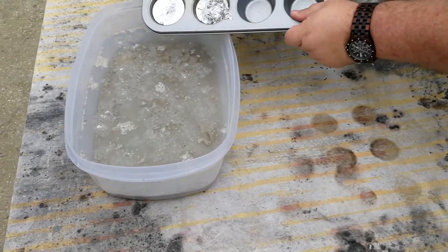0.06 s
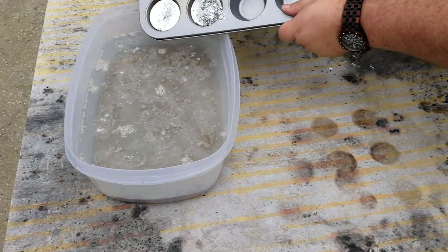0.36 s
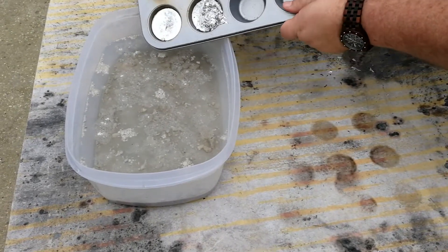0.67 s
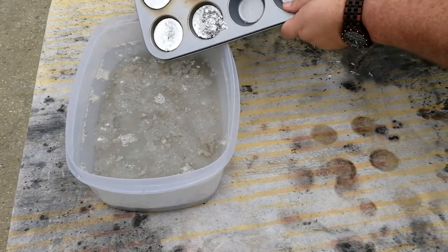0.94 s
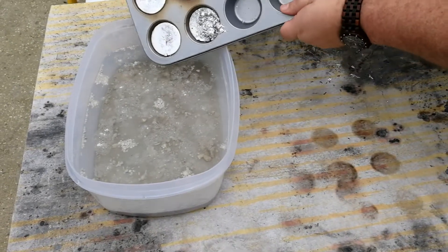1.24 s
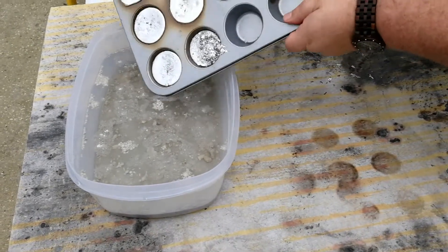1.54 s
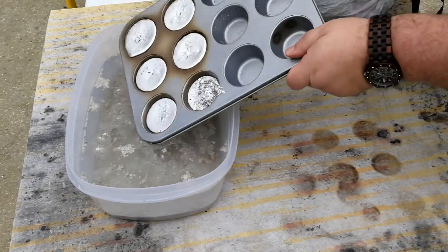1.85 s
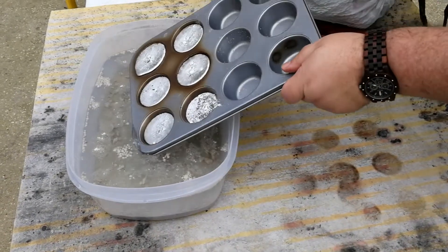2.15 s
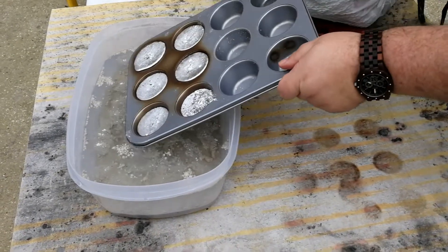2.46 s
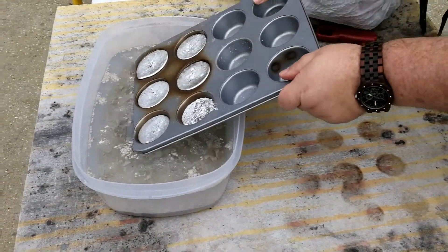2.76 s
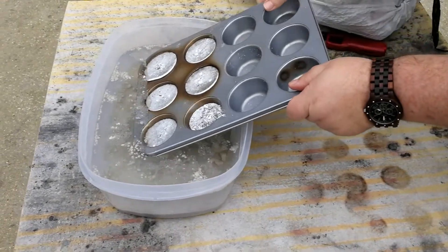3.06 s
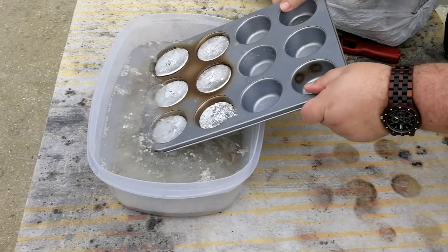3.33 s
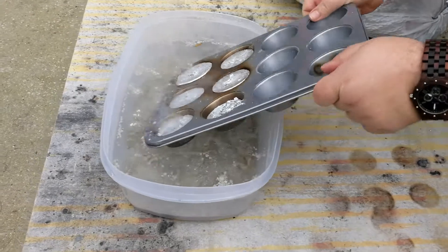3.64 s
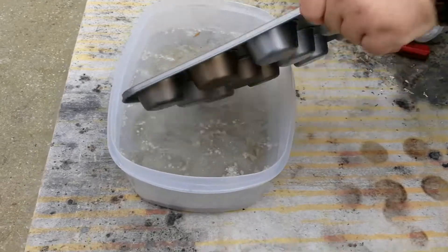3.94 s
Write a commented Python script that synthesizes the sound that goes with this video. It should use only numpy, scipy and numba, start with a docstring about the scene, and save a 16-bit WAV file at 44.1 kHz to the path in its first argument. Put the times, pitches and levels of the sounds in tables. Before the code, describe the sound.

A hot metal baking tin sizzles in a plastic tub of water. First a nearby blower whines over a low rumble, then steam hisses and the water boils and spits, close and to the left, outdoors.

```python
"""Hot baking tin dipped in water

Outdoors, a hot metal tin ticks, then goes into a plastic tub of water on the left. Steam hisses,
tiny bubbles collapse in a dense sizzle, and the water boils, spits and gushes as the cups go under.
All the while a blower whines nearby over a low rumble, probably the burner of a furnace."""
import sys
import numpy as np
from scipy import signal
from scipy.fft import rfft, irfft
from scipy.io import wavfile
from numba import njit

SR = 44100
rng = np.random.default_rng(int(sys.argv[2]) if len(sys.argv) > 2 else 0)


def log_audio(samples):
    """Write samples as a 16-bit WAV file to the path given in sys.argv[1]."""
    # one column per channel
    frames = np.atleast_2d(samples).T
    # limit to full scale, then quantise
    limited = np.clip(frames, -1, 1)
    pcm = np.round(limited * 32767).astype(np.int16)
    wavfile.write(sys.argv[1], SR, pcm)


N = 176400
T, HZ = np.arange(N) / SR, np.maximum(np.arange(N // 2 + 1) * SR / N, 1)
EAR_LAG_S = .0002  # the right ear hears this much later
SPIT_CYCLES, SPIT_SPREAD_DB = 56, 4  # bubbles in the spits and the gush

# Tone colours. Each row: frequency in Hz, relative level in dB.
RUMBLE_COLOUR = [(20, -22), (35, -9.5), (58, -8), (100, -6.5), (135, -2), (168, 4.5), (188, -1.5),
                 (213, 4.5), (245, 2), (292, -14), (348, -12), (366, -21), (386, -10.5), (422, -16),
                 (440, -25.5), (570, -31), (610, -43.5), (800, -45.5)]
RUMBLE_SIDE = [(80, -11), (200, -18.5), (270, -13), (330, 3.5), (450, 0), (800, 15)]  # the part that differs between the ears
RUMBLE_LEFT_BOOST = [(380, 0), (480, 3), (800, 7.5)]  # left ear compared with right
AIR_LEFT = [(500, -3), (850, -7), (1370, -3), (1620, 11), (2000, 1), (2370, 12), (2650, -3.5), (4700, -13),
            (7200, 2.5), (8050, 9), (9000, 5), (13000, -1.5), (16000, -17)]
AIR_RIGHT = [(500, -2), (900, 10), (1300, 9), (1630, 22.5), (2000, 1), (2370, 8.5), (3000, -4), (5000, -2),
             (5700, 10.5), (8200, 10.5), (16000, -18)]
STEAM_COLOUR = [(2000, -18), (5800, -11), (8200, -1.5), (10500, 0), (13300, 0), (14800, -2), (16000, -6)]
SIZZLE_COLOUR = [(600, -5), (1100, -3.5), (1900, -2.5), (2400, 1.5), (4200, 0), (6000, -2), (11000, -4),
                 (16000, -5.5)]
RIGHT_EAR_SHADE = [(500, -12), (2500, -7.5), (4500, -17), (8500, -13), (11000, -21), (16000, -23)]  # how much weaker the tub is on the right

# Loudness over time. Each row: time in seconds, relative level in dB.
DEEP_RUMBLE_LEVEL = [(.12, -35), (.22, -26.5), (.55, -32), (.9, -31), (1.3, -35), (1.52, -31.5),
                     (1.8, -40.5), (2.33, -34), (2.5, -42), (3.1, -43.5), (3.28, -35.5), (3.45, -43.5),
                     (4.0, -38.5)]
MIDDLE_RUMBLE_LEVEL = [(0, -25), (.25, -26), (.6, -29.5), (1.4, -28), (2.0, -28.5), (2.5, -32),
                       (2.75, -29.5), (4.0, -33)]
UPPER_RUMBLE_LEVEL = [(1.4, -41), (3.1, -46.5), (3.9, -39.5)]
WHINE_LEVEL = [(0, 2), (.6, -2), (1.25, 5.5), (2.0, -2.5), (3.7, 4.5)]
OVERTONE_LEVEL = [(0, -0.5), (1.7, -2)]
AIR_TREBLE_LEVEL = [(0, 2.5), (.16, 4.5), (.35, -2.5)]
STEAM_LEVEL = [(1.755, -57), (1.776, -34.5), (1.9, -25.5), (2.02, -24), (2.16, -29), (2.25, -33.5),
               (2.49, -36), (2.55, -31.5), (2.77, -39.5), (2.9, -31.5), (3.04, -37), (3.15, -32.5),
               (3.5, -31.5), (3.7, -37), (4.0, -40.5)]
SIZZLE_LEVEL = [(1.76, -40), (1.95, -29.5), (2.25, -33.5), (2.5, -36.5), (2.56, -29.5), (2.77, -33.5),
                (3.05, -33), (3.5, -31), (3.85, -34.5), (4.0, -38.5)]
BOIL_LEVEL = [(1.76, -57), (1.8, -44), (1.96, -39.5), (2.41, -41), (2.5, -43), (4.0, -47.5)]

# The blower's tones. Each row: multiple of the lowest pitch, left and right base levels in dB.
WHINE_TONES = [(1, -62.5, -53.5), (2, -53.5, -79), (3, -51, -77)]
# Ticks of the tin. Each row: start in seconds, relative level in dB.
TIN_TICKS = [(.0412, -8.5), (.0437, -16)]
# Notes of the hollow under the tin. Each row: pitch in Hz, base width in Hz, relative level in dB.
HOLLOW_NOTES = [(1130, 125, 2), (1640, 120, -2.5), (2790, 170, -3)]
# Boiling pockets. Each row: peak time and half length in seconds, pitch and filter width in Hz,
# level in dB.
BOIL_SURGES = [(1.816, 0.083, 3900, 1100, -41), (1.95, 0.043, 1130, 222, -38), (2.0, 0.18, 2750, 340, -41),
               (2.276, 0.22, 4710, 380, -41.5), (2.412, 0.04, 1190, 200, -41), (2.65, .065, 2830, 300, -39),
               (2.723, 0.13, 2380, 400, -42), (2.77, 0.08, 1590, 260, -42.5),
               (2.953, 0.053, 3600, 1100, -36.5), (3.21, 0.17, 3670, 600, -41),
               (3.45, 0.22, 6060, 4030, -35), (3.797, .17, 2610, 1500, -46)]
# Spits of water. Each row: start and length in seconds, pitch in Hz, spread in octaves, level in dB.
WATER_SPITS = [(2.001, 0.026, 8050, 0.31, -23), (2, 0.029, 4440, 0.058, -32),
               (2.077, 0.012, 6440, 0.613, -24), (2.081, 0.008, 2440, 0.6, -31),
               (2.181, 0.0092, 5950, 0.36, -28), (2.247, .016, 4800, 0.045, -35.5),
               (2.391, 0.007, 4870, 0.04, -30), (2.456, .016, 6730, 0.5, -32.5),
               (2.517, .022, 5540, 0.58, -26.5), (2.551, .010, 6850, 0.28, -25),
               (2.563, 0.011, 4360, 0.33, -32.5)]
# Single bubbles. Each row: start in seconds, pitch in Hz, length in cycles, level in dB.
BIG_BUBBLES = [(2.462, 510, 16, -28), (2.9655, 3750, 50, -17), (2.968, 3950, 45, -14),
               (2.9705, 3050, 50, -19.5)]
# Tub echoes, left ear then right. Each row: decay in seconds, level in dB against the direct sound.
WALL_ECHOES = [(.008, -12), (.018, 8)]


def undb(db):
    """Turn decibels into a gain."""
    return 10 ** (np.asarray(db) / 20)


def unit(x):
    """Scale a signal to an average power of 1."""
    return x / np.sqrt(np.mean(x ** 2) + 1e-20)


def curve(rows):
    """Gain over time from a loudness table."""
    return undb(np.interp(T, *np.array(rows).T))


def response(rows):
    """Gain over frequency from a colour table."""
    hz, db = np.array(rows).T
    return undb(np.interp(np.log(HZ), np.log(hz), db))


def shape(x, gain):
    """Filter a signal with one gain per frequency."""
    return irfft(rfft(x) * gain, N)


def resonance(hz, width):
    """A filter that favours one pitch."""
    return 1 / (1 + 1j * (HZ / hz - hz / HZ) * hz / width)


def noise():
    """White noise."""
    return rng.standard_normal(N)


def wander(rate_hz):
    """A smooth random wobble with a spread of 1."""
    return unit(shape(noise(), np.exp(-(HZ / rate_hz) ** 2)))


def crackle(per_s, spread_db):
    """Random clicks of tiny collapses; more spread makes a few stand out."""
    clicks = (rng.random(N) < per_s / SR) * rng.choice([-1, 1], N)
    return unit(clicks * undb(spread_db * np.minimum(rng.exponential(size=N), 5)))


@njit
def ring_bubbles(start, hz, cycles, strength, glide=.023):
    """Each bubble is a sine wave that rises slightly in pitch as it fades by 50 dB."""
    out = np.zeros(N)
    for k in range(len(start)):
        length = max(int(cycles[k] / hz[k] * SR), 2)
        first, phase = int(start[k] * SR), 0.
        for i in range(min(length, N - first)):
            phase += 2 * np.pi * hz[k] * (1 + glide * i / length) / SR
            out[first + i] += strength[k] * np.sin(phase) * np.exp(-5.75 * i / length)
    return out


def burner_rumble(deep_hz=146.6, upper_hz=295):
    """A turbulent roar, alike in both ears in the bass; its three bands swell separately."""
    colour = response(RUMBLE_COLOUR) / (1 + (HZ / 950) ** 6)
    shared = shape(noise(), colour)
    side = shape(noise(), colour * response(RUMBLE_SIDE))
    lean_left = np.sqrt(response(RUMBLE_LEFT_BOOST)) * np.exp(1j * np.pi * HZ * EAR_LAG_S)
    ears = np.array([shape(shared + side, lean_left), shape(shared - side, 1 / lean_left)])
    deep = 1 / (1 + (HZ / deep_hz) ** 10)
    upper = 1 / (1 + (upper_hz / HZ) ** 10)
    middle = 1 - deep - upper
    bands = (deep, DEEP_RUMBLE_LEVEL), (middle, MIDDLE_RUMBLE_LEVEL), (upper, UPPER_RUMBLE_LEVEL)
    return sum(shape(ears, band) / shape(shared, band).std() * curve(rows) for band, rows in bands)


def blower(whine_hz=1817.6, drift=.0006, flutter_db=1.6):
    """A wavering whine with overtones, and rushing air that is brighter at first."""
    phase = 2 * np.pi * np.cumsum(whine_hz * (1 + drift * wander(5.26))) / SR
    whine = 0
    for multiple, left_db, right_db in WHINE_TONES:
        level = curve(WHINE_LEVEL if multiple == 1 else OVERTONE_LEVEL) * undb(flutter_db * wander(13))
        whine += undb([[left_db], [right_db]]) * np.sqrt(2) * np.sin(multiple * phase) * level
    air = np.array([undb(db) * unit(shape(noise(), response(colour)))
                    for colour, db in ((AIR_LEFT, -40.5), (AIR_RIGHT, -50))])
    treble = shape(air, 1 / (1 + (4060 / HZ) ** 4))
    return whine + air - treble + treble * curve(AIR_TREBLE_LEVEL)


def tin_ticks(decay_s=.0006):
    """The hot tin ticks as it is carried to the tub."""
    hits = sum(undb(db) * (T >= start) * np.exp(-abs(T - start) / decay_s) for start, db in TIN_TICKS)
    return 2 * shape(hits * noise(), resonance(hz=6900, width=2800) ** 2)


def steam(bands=8, shift_db=.7):
    """Water flashes to steam on the metal; the hiss changes colour as the wet patch moves."""
    hiss = shape(crackle(per_s=22000, spread_db=2), response(STEAM_COLOUR))
    centres_hz = np.linspace(2000, 15800, bands)
    shifting = sum(shape(hiss, np.interp(HZ, centres_hz, band)) * undb(shift_db * wander(14))
                   for band in np.eye(bands))
    return unit(shifting) * curve(STEAM_LEVEL) * undb(1.3 * wander(32))


def sizzle(per_s=5000, cycles=3.55, spread_db=.5):
    """Thousands of tiny collapsing bubbles ring for a few cycles each."""
    count = int(per_s * N / SR)
    start = rng.uniform(0, N / SR, count)
    hz = 600 * (16000 / 600) ** np.sqrt(rng.random(count))  # mostly high pitches
    strength = undb(spread_db * np.minimum(rng.exponential(size=count), 5))
    bubbles = ring_bubbles(start, hz, np.full(count, cycles), strength * hz)
    fizz = unit(shape(bubbles, response(SIZZLE_COLOUR) / HZ ** .12))
    return fizz * curve(SIZZLE_LEVEL) * undb(.33 * wander(46))


def boil(swell_db=1.6):
    """Boiling rings the hollow between tin and water; each note swells on its own."""
    notes = 0
    for hz, width, db in HOLLOW_NOTES:
        level = undb(db + swell_db * wander(2.7))
        notes += level * shape(crackle(per_s=4000, spread_db=2.5), resonance(hz, 1.84 * width) ** 2)
    return unit(notes) * curve(BOIL_LEVEL)


def surges():
    """Each pocket of water under the cups boils up and dies away, ringing at its own gap's pitch."""
    out = np.zeros(N)
    for peak, half_length, hz, width, db in BOIL_SURGES:
        pocket = unit(shape(crackle(per_s=5000, spread_db=0), resonance(hz, width) ** 2))
        out += pocket * undb(db) * np.exp(-((T - peak) / half_length) ** 2)
    return out


def spits(per_s=6000):
    """Short bursts of bubbles as water reaches fresh hot metal."""
    out = np.zeros(N)
    for start, length, centre_hz, octaves, db in WATER_SPITS:
        count = int(length * per_s)
        times = start + length * rng.random(count)
        hz = np.clip(centre_hz * 2 ** rng.normal(0, octaves, count), 500, 15000)
        strength = undb(rng.normal(0, SPIT_SPREAD_DB, count))
        burst = ring_bubbles(times, hz, np.full(count, SPIT_CYCLES), strength)
        out += unit(burst) * np.sqrt(length * SR / N) * undb(db)
    return out


def big_bubbles():
    """Larger single bubbles plop and chirp."""
    start, hz, cycles, db = np.array(BIG_BUBBLES).T
    return ring_bubbles(start, hz, cycles, undb(db))


def gush(start_s=2.57, length_s=.19, first_hz=4700, last_hz=3330, octaves=.374, fade_db=16, count=2500):
    """Water floods the next cups: a splutter of bubbles that grow larger, and so lower, as it fades."""
    progress = rng.random(count)
    centre_hz = first_hz * (last_hz / first_hz) ** progress
    hz = np.clip(centre_hz * 2 ** rng.normal(0, octaves, count), 500, 15000)
    strength = undb(rng.normal(0, SPIT_SPREAD_DB, count) - fade_db * progress)
    splutter = ring_bubbles(start_s + length_s * progress, hz, np.full(count, SPIT_CYCLES), strength)
    return unit(splutter) * np.sqrt(length_s * SR / N) * undb(-36)


def tub(sound, low_cut_hz=300, rock_hz=3, echo_samples=4096):
    """The dipping sounds carry no bass, and the echoes from the tub's walls shift as the water rocks."""
    direct = shape(sound, 1 / (1 + (low_cut_hz / HZ) ** 4))
    ears = []
    for decay_s, db in WALL_ECHOES:
        rocking = np.pi * wander(rock_hz)
        reflected = 0
        for share in (np.cos(rocking), np.sin(rocking)):  # blend two sets of echoes
            echo = rng.standard_normal(echo_samples) * np.exp(-T[:echo_samples] / decay_s)
            reflected += share * signal.oaconvolve(direct, echo / np.linalg.norm(echo))[:N]
        ears.append((direct + undb(db) * reflected) / np.hypot(1, undb(db)))
    left, right = ears
    delay = np.exp(-2j * np.pi * HZ * EAR_LAG_S)
    return np.array([left, shape(right, response(RIGHT_EAR_SHADE) * delay)])


def scene():
    """The burner and blower run on while the tin cools in the tub."""
    background = burner_rumble() + blower()
    dipping = tin_ticks() + steam() + sizzle() + boil() + surges() + spits() + big_bubbles() + gush()
    return background + tub(dipping)


def record(dry, top_hz=15800):
    """A steep filter cuts the highest treble."""
    return signal.sosfilt(signal.ellip(10, .2, 80, top_hz, fs=SR, output="sos"), dry)


dry = scene()
out = record(dry)
log_audio(out)
```